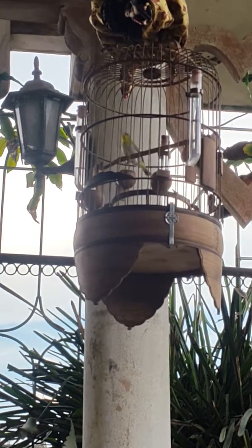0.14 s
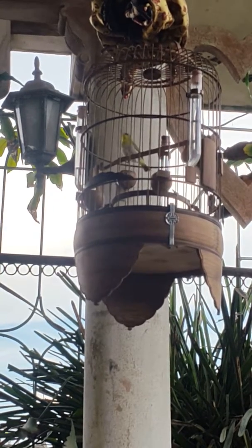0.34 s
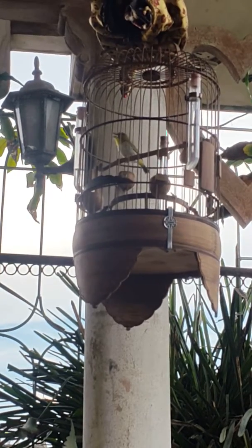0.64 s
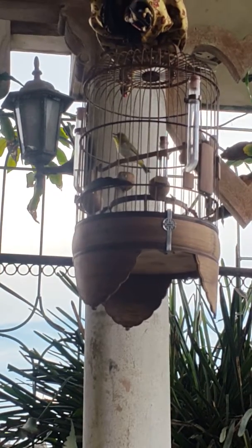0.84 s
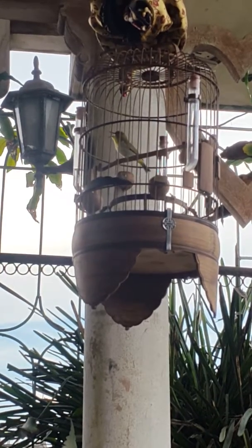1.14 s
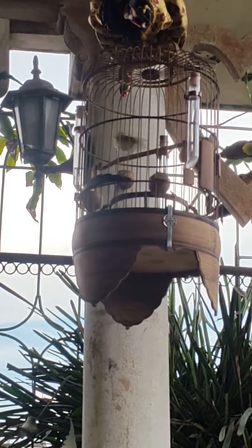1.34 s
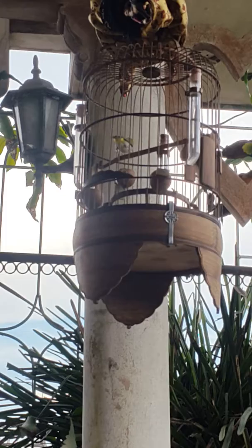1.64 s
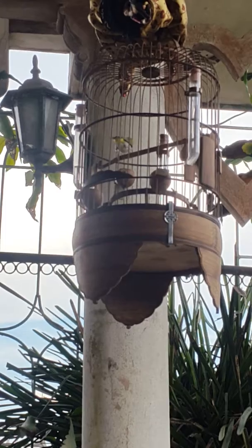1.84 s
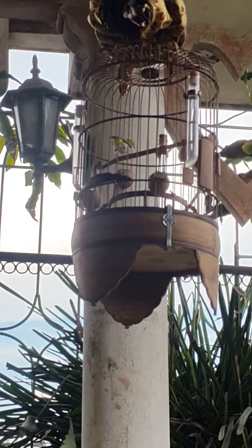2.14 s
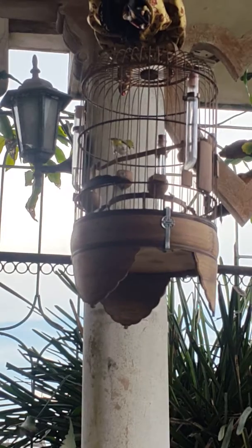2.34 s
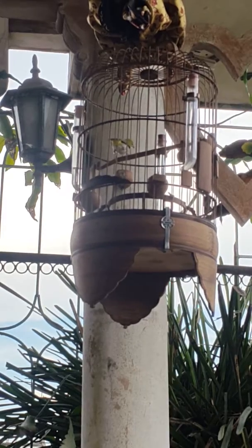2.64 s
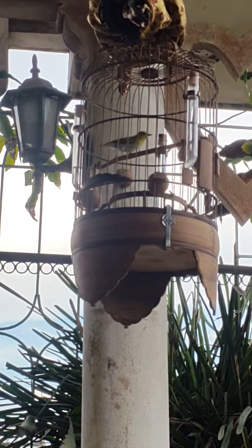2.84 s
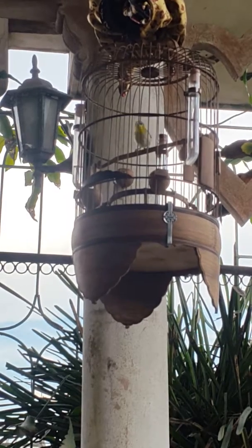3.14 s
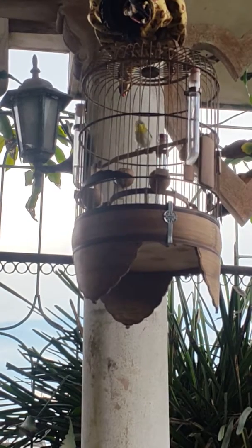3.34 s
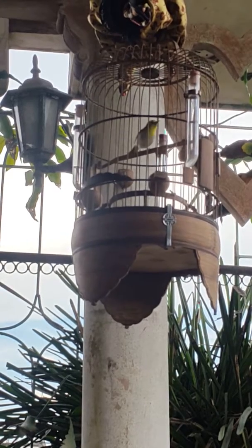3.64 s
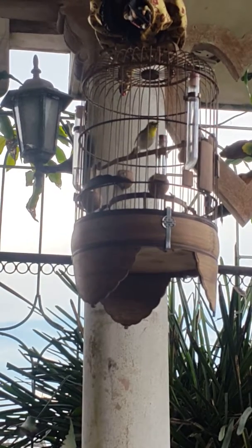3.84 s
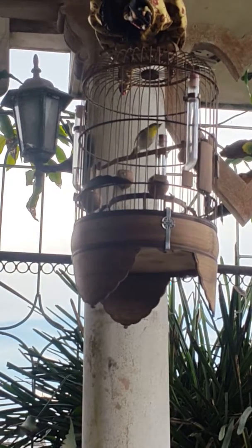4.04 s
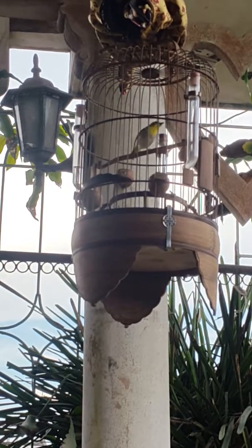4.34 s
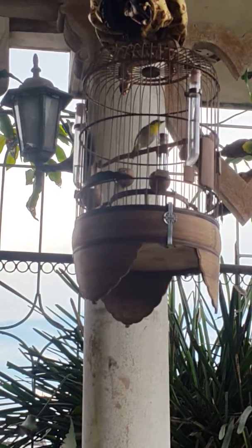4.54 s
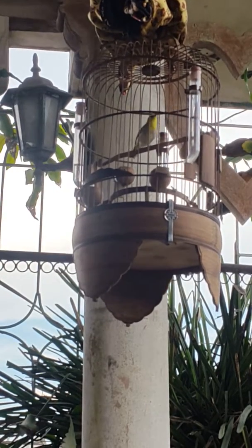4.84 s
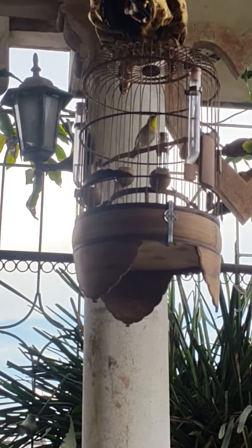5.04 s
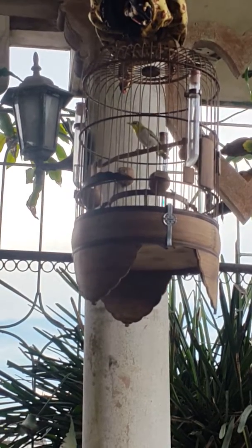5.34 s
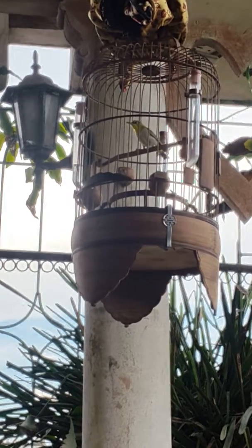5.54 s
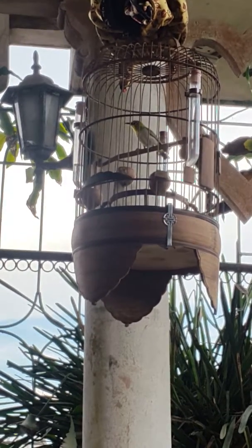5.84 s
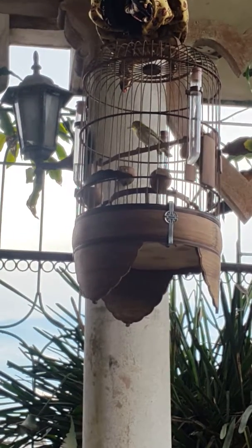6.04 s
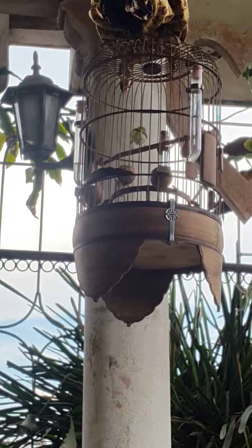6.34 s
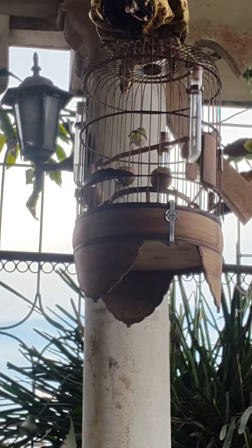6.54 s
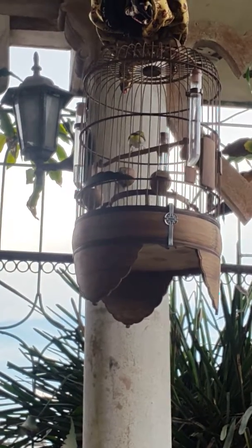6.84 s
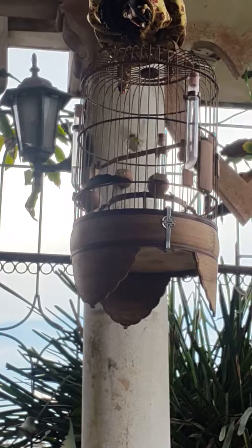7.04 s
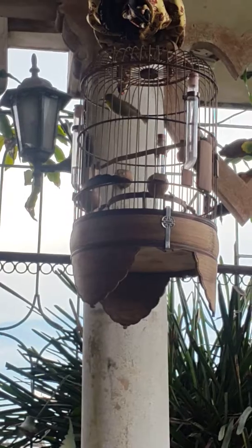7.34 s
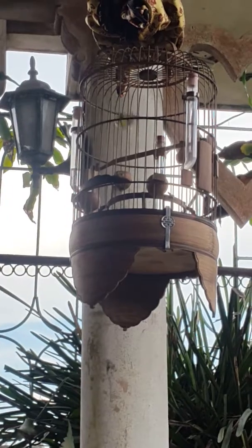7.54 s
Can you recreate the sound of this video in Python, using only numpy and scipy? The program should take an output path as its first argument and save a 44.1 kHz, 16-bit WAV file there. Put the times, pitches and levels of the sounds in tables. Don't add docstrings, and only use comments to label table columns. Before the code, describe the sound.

A small caged bird sings three bursts of fast, high, falling whistles under a hard balcony roof, over low traffic rumble and faint far chirps.

```python
import sys
import numpy as np
from scipy import signal
from scipy.fft import rfft, irfft, next_fast_len
from scipy.io import wavfile
from scipy.ndimage import uniform_filter1d

SR = 44100
rng = np.random.default_rng(int(sys.argv[2]) if len(sys.argv) > 2 else 0)


def boost_factor(decibels):
    exponent = np.asarray(decibels, float) / 20
    return 10 ** exponent


def output_pcm(signal):
    pcm = np.clip(np.atleast_2d(signal).T, -1, 1) * 32767
    wavfile.write(sys.argv[1], SR, np.round(pcm).astype(np.int16))


N = 339562


def rms_one(x):
    return x / np.sqrt(np.mean(x ** 2) + 1e-20)


def at_hz(points, hz):
    curve_hz, value = np.array(points).T
    return np.interp(np.log(hz + 1), np.log(curve_hz), value)


def port_gain(left_db, right_db):
    return boost_factor([[left_db], [right_db]])


def drift(rate_hz):
    knots = rng.standard_normal(N // 40 + 2002)
    r = np.exp(-80 * np.pi * rate_hz / SR)
    slow = signal.lfilter([1], [1, -2 * r, r * r], knots)[2000:]
    return np.interp(np.arange(N) / 40, np.arange(len(slow)), rms_one(slow))


def band(x, low_hz, high_hz):
    edges_hz = [low_hz, min(high_hz, .45 * SR)]
    return signal.sosfilt(signal.butter(3, edges_hz, "band", fs=SR, output="sos"), x)


def band_noise(low_hz, high_hz):
    return rms_one(band(rng.standard_normal(N), low_hz, high_hz))


WARBLE_HZ, WARBLE_FADE_S, WARBLE_DB_PER_DEPTH = 106, 0.05, 45


def whistle(notes, waver, warble=None):
    t, hz, level = np.arange(N) / SR, np.full(N, 5000.), np.zeros(N)
    for k, note in enumerate(notes):
        s, note_hz, note_db = np.transpose(note)
        on = slice(int(s[0] * SR), int(s[-1] * SR))
        hz[max(on.start - 100, 0):] = note_hz[0]
        hz[on.start:] = np.interp(t[on.start:], s, note_hz)
        level[on] = boost_factor(np.interp(t[on], s, note_db))
        if warble:
            since = np.maximum(t[on] - s[1], 0)
            swing = warble[k] * np.exp(-since / WARBLE_FADE_S) * np.sin(2 * np.pi * WARBLE_HZ * since)
            hz[on] *= 1 - swing
            level[on] *= boost_factor(-WARBLE_DB_PER_DEPTH * swing)
    hz = uniform_filter1d(hz, size=90) * (1 + waver * drift(150))
    level = uniform_filter1d(uniform_filter1d(level, size=50), size=50)
    return 2 * np.pi * np.cumsum(hz) / SR, level


HOOK = [(0, 1), (.14, .66), (.3, .24), (.45, 0.04), (.6, 0.06), (.8, 0.09), (1, 0.03)]
DIP = [(0, 1), (.17, .68), (.33, 0.31), (.52, 0.016), (.7, .1), (1, 0.12)]
DIVE = [(0, 1.06), (.28, 0.81), (.66, 0.16), (1, 0.016)]
LEDGE = [(0, 1.06), (.1, 0.58), (.27, 0.43), (.42, 0.33), (.62, .15), (1, 0.025)]
TERRACE = [(0, 0.92), (.11, 0.57), (.2, 0.39), (.3, .35), (.55, .26), (.83, .11), (1, 0.04)]
GLIDE = [(0, 1), (.17, 0.51), (.36, .36), (.76, .14), (1, 0.011)]
SCOOP = [(0, 1), (.17, .52), (.36, .15), (.62, 0.063), (.85, .22), (1, .18)]
CURL = [(0, 0.93), (.1, 0.43), (.28, .12), (.55, 0), (1, 0.073)]
SHELF = [(0, 1.09), (.07, .62), (.15, .47), (.34, .49), (.45, .31), (.63, .2), (1, 0.048)]
SLIDE = [(0, 0.91), (.15, .55), (.21, .38), (.3, .45), (.56, .17), (1, 0.031)]
STEPS = [(0, 0.95), (.08, .64), (.36, .47), (.48, .36), (.55, 0.024), (.63, .3), (.86, .24), (1, 0.03)]
STUMBLE = [(0, 0.99), (.1, .5), (.2, .41), (.38, .4), (.44, .26), (.52, .28), (.6, 0.1), (.68, .4),
           (.85, 0.38), (1, 0.02)]
CLIMB = [(0, 0.19), (.1, .22), (.22, .08), (.28, 0.06), (.3, .36), (.5, .6), (.72, 0.97), (1, 0.94)]
DROP = [(0, .99), (.18, 1), (.33, .84), (.49, .38), (.73, .2), (1, 0)]
ARCH = [(0, 1.07), (.08, .46), (.22, .81), (.38, .48), (.54, .37), (.72, .42), (.85, 0.19), (1, 0.083)]
WAVE = [(0, 1), (.07, .4), (.13, 0.68), (.22, 0.67), (.47, .12), (.53, 0.11), (.64, .42), (.77, 0.19),
        (1, 0.033)]
RIPPLE = [(0, 1), (.08, .36), (.18, 0.63), (.23, .5), (.29, 0.1084), (.36, .13), (.47, .48), (.6, 0.23),
          (1, 0.03)]
GESTURES = {"hook": (HOOK, (-6, -6.5, 3, 151)), "dip": (DIP, (-6.5, 2, -1.5, 51.5)),
            "dive": (DIVE, (-1.5, -3, 1.7, 48)), "curl": (CURL, (1.3, 0.5, 1.9, 410)),
            "shelf": (SHELF, (-0.5, -2.5, -8.5, 500.5)), "slide": (SLIDE, (-4, -8.5, -0.5, 549)),
            "steps": (STEPS, (0.5, -3.5, -4.5, 749)), "ledge": (LEDGE, (1.5, -3.5, 3, 498.5)),
            "terrace": (TERRACE, (-6, -9.5, 10.5, 499.5)), "glide": (GLIDE, (-10, -4.5, -7.5, 501.5)),
            "scoop": (SCOOP, (-4.5, -8.5, 4.5, 52)), "stumble": (STUMBLE, (-4, -4.5, -1.5, 45)),
            "climb": (CLIMB, (-4.5, -6.5, -3, 28)), "drop": (DROP, (-4, -6.5, 7.5, 250)),
            "arch": (ARCH, (-6, -2.5, 8, 48)), "wave": (WAVE, (-2.5, -3, -1.5, 499.5)),
            "ripple": (RIPPLE, (-4, -11.5, 4, 306))}
# gesture, t/s, length/s, level/dB, highest f/Hz, lowest f/Hz
FIRST_PHRASE = [
    ("hook", .712, .125, -17, 6550, 4560),
    ("dip", .855, .135, -16, 6200, 4000),
    ("dive", 1.008, .08, -14, 6850, 4450),
    ("shelf", 1.136, .192, -13, 7150, 4170),
    ("curl", 1.400, .116, -15, 7170, 4430),
    ("steps", 1.563, .143, -14, 7200, 4850),
    ("climb", 1.753, .179, -15, 5700, 3820),
    ("drop", 1.953, .078, -15.5, 6300, 3560),
]
SECOND_PHRASE = [
    ("arch", 3.726, .186, -17, 7340, 4450),
    ("ledge", 3.967, .153, -15, 7140, 4250),
    ("scoop", 4.161, .118, -15, 6410, 4400),
    ("glide", 4.309, .131, -13, 6370, 3950),
    ("steps", 4.496, .141, -15, 7230, 4900),
    ("climb", 4.693, .179, -14, 5750, 3850),
    ("drop", 4.901, .076, -15, 6300, 3400),
]
THIRD_PHRASE = [
    ("wave", 6.377, .235, -17, 7440, 4350),
    ("slide", 6.728, .162, -15, 6900, 4230),
    ("ripple", 6.966, .212, -14, 7430, 4280),
    ("terrace", 7.254, .139, -16, 7100, 4270),
    ("stumble", 7.450, .153, -15, 7220, 4350),
    ("glide", 7.681, .08, -23, 6250, 3950),
]
NOTES = FIRST_PHRASE + SECOND_PHRASE + THIRD_PHRASE
# level/dB at start, each quarter, end
LOUDNESS_COURSE = [(-1.5, 4, 0, -2, -1.5), (-3, -2, 0, -1.5, -11), (-1.5, 0, -0.5, -1, -4.5),
                   (-4.5, -4, -0.5, -3, -0.5), (-0.5, 0.9, -2.5, -2, -4), (-0.5, 0.4, -1.6, 0.2, -1.5),
                   (-2.5, 1.3, 3.5, -1.2, -5.5), (-8, 2.8, 0.7, 0.3, 4), (0.7, -4.5, 1.5, -3.1, -3.5),
                   (0.5, -1.5, 1.3, -1, -4.5), (3.5, 1.5, 2.8, 0, -5.5), (-3, -0.5, 0.5, -0.7, -2),
                   (-2.5, 1.4, -1, 2, 4.5), (-6.5, 1.9, 1.5, -3.5, 1.5), (-5.5, 3, 2.8, -1, -3),
                   (-0.9, -1.5, -3, 1.7, -5.5), (-1.5, 1.1, 0.3, -0.2, -3.5), (-2, 1.6, -1.5, -2.5, -2),
                   (-5, 4, -4, -1, -8.5), (-4, -1.1, -3, 2, -0.5), (-7, 3, 1.2, 0.6, 0.6)]
# f/Hz, level/dB
BEAK = [(2900, -10), (3300, -25.5), (3900, -11), (4300, -10), (4700, -6), (5200, -3.5), (5600, 1),
        (6300, -1), (7300, 1)]
FLICK_S, FLICK_HZ, FLICK_DB = .006, 2400, -21
CLOSE_S, CLOSE_DB = .018, -13.5
WARM_UP_DB, WARM_UP_S = -10, 0.033
TRILL_PER_S, TRILL_HZ, TRILL_DB = 41, 300, 3
TRILL_FROM, TRILL_TO = 0.3, .9


def song():
    notes = []
    phrase_starts = [phrase[0][1] for phrase in (FIRST_PHRASE, SECOND_PHRASE, THIRD_PHRASE)]
    along = np.linspace(0, 1, num=60)
    for (gesture, start, length, level_db, high_hz, low_hz), course_db in zip(NOTES, LOUDNESS_COURSE):
        shape, (half_db, whole_db, swell_db, sag_hz) = GESTURES[gesture]
        glide_s = length - FLICK_S
        s = start + FLICK_S + along * glide_s
        closing = np.clip(1 - (s[-1] - s) / CLOSE_S, 0, 1)
        height = np.interp(along, *np.transpose(shape))
        hz = low_hz + (high_hz - low_hz) * height - sag_hz * closing
        db = level_db + swell_db * (along - .5) + at_hz(BEAK, hz) + CLOSE_DB * closing ** 3
        db = db + np.interp(along * (len(course_db) - 1), np.arange(len(course_db)), course_db)
        if start in phrase_starts:
            db = db + WARM_UP_DB * np.exp(-(s - start) / WARM_UP_S)
        if gesture == "climb":
            shaking = (along > TRILL_FROM) * np.clip((TRILL_TO - along) * 5.8, 0, 1)
            shake = shaking * np.cos(2 * np.pi * TRILL_PER_S * (along - TRILL_FROM) * glide_s)
            hz = hz + TRILL_HZ * shake
            db = db + TRILL_DB * shake
        from_hz = hz[0] - FLICK_HZ * (hz[0] / 7000) ** 2
        from_db = db[0] + FLICK_DB + at_hz(BEAK, from_hz) - at_hz(BEAK, hz[0])
        notes.append([(start, from_hz, from_db), *zip(s, hz, db)])
    return notes


WARBLES = {"hook": .06, "dip": .065, "dive": .07, "curl": .04, "shelf": .045, "slide": .075, "steps": .015,
           "ledge": .04, "terrace": .055, "glide": .055, "scoop": .055, "stumble": .05, "climb": .004,
           "drop": 0, "arch": .04, "wave": .055, "ripple": .06}
# f/multiple of pitch, left level/dB, right level/dB
PARTIALS = [(.5, -67, -65.5), (1.5, -38.5, -55.5), (2.0, -27, -40), (2.5, -45.5, -45.5), (3.0, -25, -32)]
# f/Hz, level/dB
TREBLE = [(7000, 12.5), (8300, 2), (9500, 6.5), (10800, -7.5), (12000, -6.5), (13500, -0.5), (15500, 1)]
HOARSE_RAD = 1.1


def bird():
    notes = song()
    phase, level = whistle(notes, waver=.007, warble=[WARBLES[row[0]] for row in NOTES])
    level = level * boost_factor(1.6 * drift(90))
    side = port_gain(-50, -48) * band_noise(8500, 9000)
    side = side + port_gain(-46, -47.5) * band_noise(7380, 8400)
    side = side + port_gain(-42.5, -51) * band_noise(10000, 16500)

    throats = np.array([GESTURES[row[0]][1] for row in NOTES])
    note = np.searchsorted([rows[0][0] for rows in notes[1:]], np.arange(N) / SR + 0.0062)
    for multiple, left_db, right_db in PARTIALS:
        hoarse = drift(170)
        throat_db = throats[note, int(multiple % 1 == 0)]
        throat = boost_factor(throat_db + 1.9 * drift(9.6) + 1.82 * hoarse[::-1])
        under_top = np.gradient(phase) * multiple < .8 * np.pi
        partial = np.sin(multiple * phase + HOARSE_RAD * hoarse)
        side = side + port_gain(left_db, right_db) * throat * under_top * partial

    ticks = np.zeros(N)
    ticks[[round(rows[0][0] * SR) for rows in notes]] = [boost_factor(rows[1][2]) for rows in notes]
    puffs = signal.lfilter([1], [1, -.985], ticks) * rng.standard_normal(N)
    side = side * level + port_gain(-48, -55) * 10 * band(puffs, 4600, 16000)

    size = next_fast_len(N)
    colour = boost_factor(at_hz(TREBLE, np.fft.rfftfreq(size, 1 / SR)))
    side = irfft(rfft(side, size) * colour, size)[:, :N]
    voice = port_gain(-11, -3) * np.sin(phase) * level + side
    return signal.fftconvolve(voice, balcony(), axes=1)[:, :N]


def tail(t60_s, build_s):
    t = np.arange(SR) / SR
    shape = boost_factor(-60 * t / t60_s) * (1 - np.exp(-t / build_s))
    return rng.standard_normal((2, SR)) * shape / np.sqrt(np.sum(shape ** 2))


# delay t/s, level/dB
ECHOES_LEFT = [(.0009, -12), (.0053, -14), (.0083, -14), (.0185, -17), (.0270, -18)]
ECHOES_RIGHT = [(.0026, -8), (.0102, -11), (.0146, -11), (.0225, -13), (.0268, -11), (.0420, -17)]
ROOF_T60_S, ROOF_BUILD_S = 0.49, 0.0048
LATE_DB, LATE_T60_S, LATE_BUILD_S = -14.5, 0.73, .04
SURFACE_CUT_HZ, LEFT_LAG_S = 16000, .00005


def balcony():
    response = port_gain(-10, -4) * tail(ROOF_T60_S, ROOF_BUILD_S)
    response = response + boost_factor(LATE_DB) * tail(LATE_T60_S, LATE_BUILD_S)
    for port, echoes in enumerate((ECHOES_LEFT, ECHOES_RIGHT)):
        for k, (delay_s, echo_db) in enumerate(echoes):
            response[port, round(delay_s * SR)] += boost_factor(echo_db) * (-1) ** k
    response = signal.sosfilt(signal.butter(2, SURFACE_CUT_HZ, fs=SR, output="sos"), response)
    response[0, round(LEFT_LAG_S * SR) + np.arange(2)] += .55
    response[1, 0] += 1
    return response


FAR_GLIDE_RATE, FAR_SWELL_SHARE = 2.8, .08


def far_whistles(rows, waver, fade_db):
    along = np.linspace(0, 1, num=12)
    glide = (1 - np.exp(-FAR_GLIDE_RATE * along)) / (1 - np.exp(-FAR_GLIDE_RATE))
    shape_db = fade_db * (along - .3) - 8 * np.clip(1 - along / FAR_SWELL_SHARE, 0, 1)
    out = np.zeros(N)
    for start, length, from_hz, to_hz, level_db in rows:
        note = np.transpose([start + length * along, from_hz + (to_hz - from_hz) * glide, level_db + shape_db])
        phase, level = whistle([note], waver)
        out += level * np.sin(phase)
    return out


# t/s, peak level/dB
CLINKS = [
    (1.60, -64),
    (1.665, -58),
    (2.03, -63),
    (2.085, -52),
    (2.25, -59),
]
# f/Hz, level/dB, t60/s
METAL = [(1290, -4, .5), (1335, -3, .6), (1600, -8, .12), (2180, -7, .4), (2200, -1, .65), (2620, -11, .4),
         (2860, -16, .5)]


def clinks():
    at, out = [round(s * SR) for s, db in CLINKS], np.zeros(N)
    blow_db = np.array(CLINKS)[:, 1]
    for hz, mode_db, t60_s in METAL:
        blows = np.full(N, 1e-18)
        blows[at] = boost_factor(blow_db + mode_db + rng.normal(0, 1.5, len(at)))
        r, w = boost_factor(-60 / (t60_s * SR)), 2 * np.pi * hz / SR
        out += signal.lfilter([0, np.sin(w)], [1, -2 * r * np.cos(w), r * r], blows)
    return out


# start t/s, end t/s, low f/Hz, high f/Hz,
# level/dB
SWEEPS = [(0.44, 1.155, 1310, 1860, -58), (2.237, 2.904, 1180, 2030, -56), (2.399, 2.815, 2400, 7200, -64),
          (1.193, 1.398, 870, 1630, -55), (2.1, 2.996, 2760, 2940, -64.5),
          (3.152, 3.452, 1154, 1727, -63.5), (5.602, 6.05, 1784, 2800, -69),
          (1.658, 1.711, 1190, 1830, -53), (2.073, 2.143, 1220, 1740, -51.5),
          (2.385, 2.42, 4500, 8460, -66), (2.395, 2.717, 5800, 6000, -66), (2.40, 2.6, 4470, 4560, -66),
          (2.42, 2.66, 6480, 6620, -68), (2.42, 2.62, 5100, 5230, -66), (2.42, 2.7, 8200, 8360, -86),
          (2.42, 2.7, 8550, 8650, -82)]


def sweeps():
    out = np.zeros((2, N))
    bristles = rng.standard_normal((2, N)) * boost_factor(1.4 * drift(25))
    for start, end, low_hz, high_hz, level_db in SWEEPS:
        on = slice(int(start * SR), int(end * SR))
        along = np.linspace(0, 1, num=on.stop - on.start)
        stroke = np.abs(np.sin(np.pi * along ** 0.74)) ** .8
        out[:, on] += boost_factor(level_db) * stroke * rms_one(band(bristles[:, on], low_hz, high_hz))
    return out


# t/s, length/s, from f/Hz, to f/Hz, level/dB
FAR_BIRDS = [
    (.0, 0.063, 5380, 4590, -55),
    (.11, 0.043, 5380, 4160, -56),
    (.37, 0.28, 7320, 4470, -58.5),
    (3.28, 0.38, 5620, 4080, -64.5),
    (5.45, 0.31, 5560, 4290, -63),
    (5.96, 0.23, 6770, 4380, -67),
]
# t/s, length/s, from f/Hz, to f/Hz, level/dB
SQUEAKS = [
    (4.6, .05, 2100, 2020, -63),
    (5.50, 0.23, 1110, 1200, -56.5),
    (5.50, .22, 1885, 1860, -61.5),
    (5.65, 0.104, 1590, 1700, -52.5),
    (5.75, 0.23, 1720, 1800, -55.5),
    (5.68, 0.27, 750, 895, -54.5),
    (6.10, 0.32, 630, 625, -47),
    (2.38, 0.22, 1800, 1810, -63),
    (2.53, 0.266, 2300, 1700, -56),
]
YARD_T60_S, YARD_DIRECT = .45, .5


def far_away():
    calls = far_whistles(FAR_BIRDS, waver=0.13, fade_db=-5)
    birds = signal.fftconvolve(calls[None], tail(0.44, 0.004), axes=1)[:, :N]
    yard = tail(YARD_T60_S, .005)
    yard[:, 0] += YARD_DIRECT
    hinge = boost_factor(-5 + 3.5 * drift(25)) * far_whistles(SQUEAKS, waver=0.03, fade_db=-10)
    things = signal.fftconvolve((hinge + clinks())[None], yard, axes=1)[:, :N]
    return birds * port_gain(-6, 3) + (things + sweeps()) * port_gain(-1.5, 1.5)


# f/Hz, correlation/-1..1
LIKENESS = [(60, 0.97), (180, 0.98), (550, .95), (1650, -.7), (4970, .8), (15000, 0.04)]
# f/Hz, left minus right level/dB
PORTS = [(60, 0.5), (130, -1), (290, -0.5), (640, -1.5), (1410, -1.5), (3100, -6), (6820, -15.5),
         (15000, 11)]
TOWN_LAG_S = 0.0002


def town_noise(spectrum):
    hz = np.fft.rfftfreq(N, 1 / SR)
    sign = np.array([[1], [-1]])
    mid, side = rfft(rng.standard_normal((2, N)))
    alike = np.clip(at_hz(LIKENESS, hz), -1, 1)
    pair = np.sqrt(1 + alike) * mid + np.sqrt(1 - alike) * side * sign
    pair[0] *= np.exp(-2j * np.pi * hz * TOWN_LAG_S)
    tilt = boost_factor(at_hz(PORTS, hz) / 2 * sign)
    out = irfft(pair * tilt * boost_factor(at_hz(spectrum, hz)), N)
    return out / np.sqrt(np.mean(out.mean(axis=0) ** 2))


# t/s, rumble level/dB
TOWN = [(0.0, -39), (0.62, -38.5), (1.61, -40.5), (1.91, -39), (3.62, -42), (3.86, -38.5), (4.07, -42),
        (5.21, -41.5), (5.6, -45), (6.13, -41), (6.35, -44.5), (7.7, -43.5)]
# f/Hz, level/dB per Hz
RUMBLE = [(8.8, -49.5), (15, -31), (22, -36), (32, -23), (40, -18.5), (50, -13), (64, -5), (113, 1),
          (136, -1), (217, -12), (309, -10), (355, -10), (414, -19.5), (441, -23), (539, -22.5), (600, -24),
          (780, -49), (1320, -120)]
# f/Hz, level/dB per Hz
WASH = [(240, -34), (400, -7), (466, -11), (527, -17.5), (717, -12), (960, -16), (1100, -17.5), (1570, -23),
        (2130, -29), (2860, -27.5), (4060, -35.5), (4260, -34.5), (6750, -39), (7650, -39), (8300, -53),
        (9750, -52), (15700, -47)]
WASH_DB, WASH_FOLLOWS = -56.5, 0.45
PASSING_S, PASSING_WIDTH_S, PASSING_DB = 2.15, 0.96, 2.5
INSECT_HZ, INSECT_WIDTH_HZ, INSECT_DB = 12450, 250, -85.5


def town():
    t = np.arange(N) / SR
    rumble_db = np.interp(t, *np.transpose(TOWN))
    passing_db = PASSING_DB * np.exp(-((t - PASSING_S) / PASSING_WIDTH_S) ** 2)
    wash_db = WASH_DB + WASH_FOLLOWS * (rumble_db - rumble_db.mean()) + passing_db
    rumble = boost_factor(rumble_db + 0.34 * drift(2.2)) * town_noise(RUMBLE)
    wash = boost_factor(wash_db + 1.3 * drift(6.1)) * town_noise(WASH)
    half_hz = INSECT_WIDTH_HZ / 2
    insects = rms_one(band(rng.standard_normal((2, N)), INSECT_HZ - half_hz, INSECT_HZ + half_hz))
    return rumble + wash + boost_factor(INSECT_DB + 1.5 * drift(3)) * insects


def scene():
    return boost_factor(5.0) * bird() + far_away() + town()


TOP_HISS_DB = -82.5


def top_cut(x):
    return signal.sosfilt(signal.butter(12, 15830, fs=SR, output="sos"), x)


def record(dry):
    hiss = boost_factor(TOP_HISS_DB) * rms_one(band(rng.standard_normal((2, N)), 13500, 17000))
    return top_cut(dry + hiss)


dry = scene()
out = record(dry)
output_pcm(out)
```